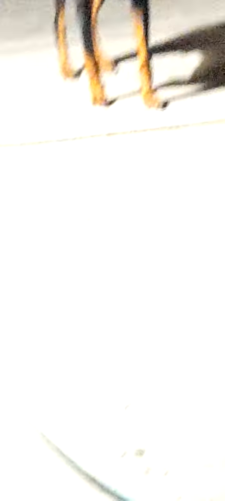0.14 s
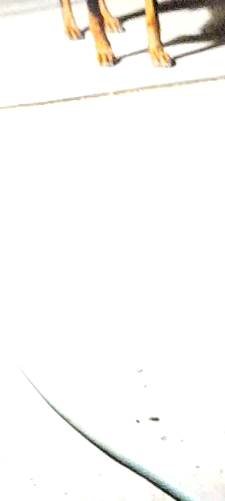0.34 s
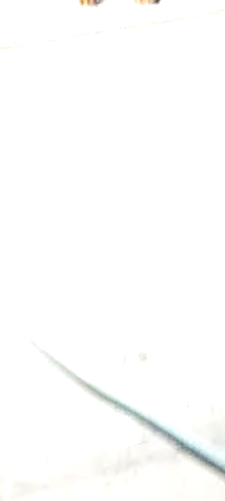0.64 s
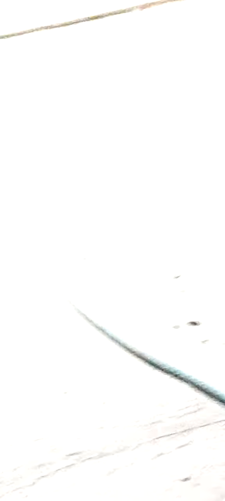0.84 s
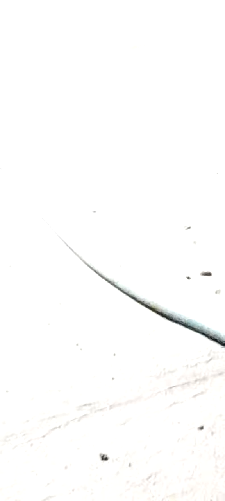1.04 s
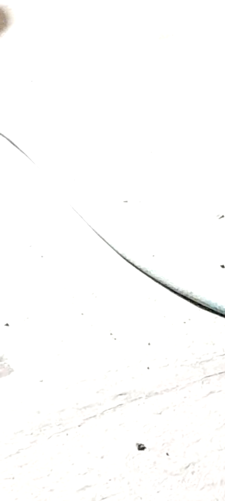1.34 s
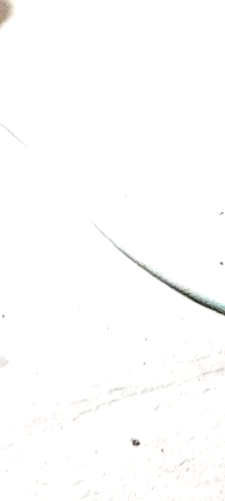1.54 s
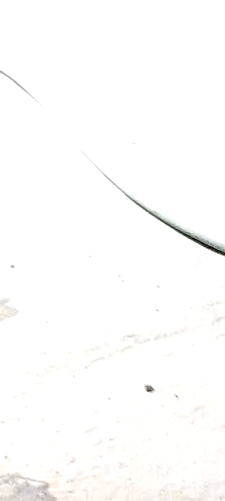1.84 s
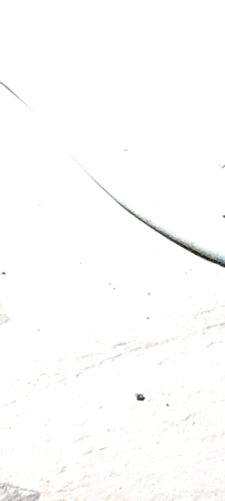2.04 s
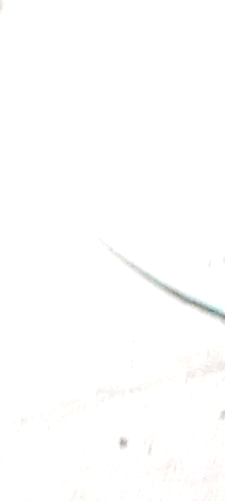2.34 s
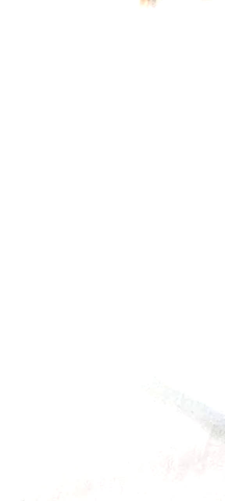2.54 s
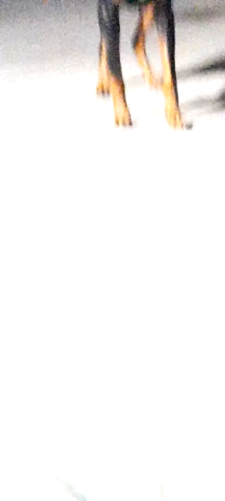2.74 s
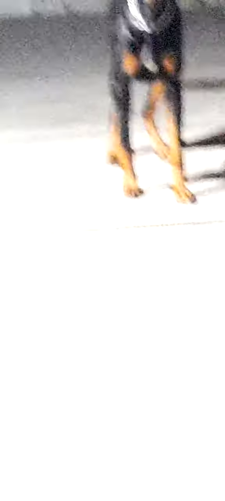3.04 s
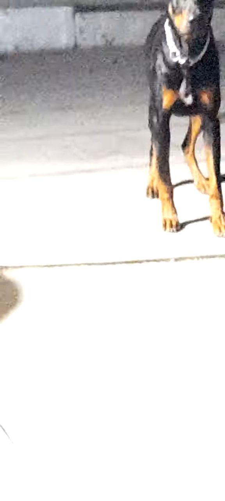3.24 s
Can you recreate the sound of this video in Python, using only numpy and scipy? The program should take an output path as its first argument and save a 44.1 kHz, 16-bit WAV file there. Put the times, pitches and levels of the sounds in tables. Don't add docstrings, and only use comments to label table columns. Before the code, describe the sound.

A ball thumps on concrete with gritty knocks, then a quiet gap, a sharp scrape with softer thumps, light claw ticks, and a last, loudest bounce; open yard at night, close handheld phone, low traffic rumble.

```python
import sys
import numpy as np
from scipy import signal
from scipy.fft import rfft, irfft, next_fast_len
from scipy.io import wavfile
from scipy.ndimage import uniform_filter1d

SR = 44100
rng = np.random.default_rng(int(sys.argv[2]) if len(sys.argv) > 2 else 0)


def transcribe(signal):
    frames = np.atleast_2d(signal).T
    limited = np.clip(frames, -1, 1)
    pcm = np.round(limited * 32767).astype(np.int16)
    wavfile.write(sys.argv[1], SR, pcm)


def volts(x):
    e = np.asarray(x, float) / 20
    return 10 ** e


N = 149940

# (f/Hz, correlation)
LIKENESS = [(30, .995), (70, 0.975), (180, 0.94), (550, 0.64), (1650, -0.096), (4970, -0.69), (15000, 0.29)]


def evened(x):
    return x / np.sqrt(np.mean(x ** 2) + 1e-20)


def read(points, hz):
    f, value = np.transpose(points)
    return np.interp(np.log(hz + 1), np.log(f + 1), value)


def curve(points):
    return np.interp(np.arange(N) / SR, *np.transpose(points))


def add(mix, s, sound):
    part = mix[round(s * SR):][:len(sound)]
    part += sound[:len(part)]


def colour(x, db_of_hz, lag_s=0):
    n = x.shape[-1]
    size = next_fast_len(n + 2048)
    hz = np.fft.rfftfreq(size, 1 / SR)
    delay = np.exp(-2j * np.pi * hz * lag_s)
    return irfft(rfft(x, size) * volts(db_of_hz(hz)) * delay, size)[..., :n]


def wash(spectrum, patchy_db):
    frames = N // 256 + 5
    hz = np.fft.rfftfreq(2048, 1 / SR)
    a, b, c, d, patches = rng.standard_normal((frames, len(hz), 5)).T
    patches = uniform_filter1d(patches, size=12, axis=0)
    patches = evened(uniform_filter1d(patches, size=10, axis=1))
    same = np.clip(read(LIKENESS, hz), -1, 1)[:, None]
    left = a + 1j * b
    right = same * left + np.sqrt(1 - same ** 2) * (c + 1j * d)
    z = np.array([left, right]) * volts(read(spectrum, hz)[:, None] + patchy_db * patches)
    return evened(signal.istft(z[..., ::2], nperseg=2048, noverlap=1536)[1][:, :N])


def background():
    # (f/Hz, level/dB per Hz)
    traffic_spectrum = [(12, -99), (26, -22.5), (51, 2.5), (214, -10.5), (245, -9.5), (408, -17.5),
                        (446, -20), (1800, -28), (4000, -60), (5200, -84), (8800, -120)]
    # (f/Hz, level/dB per Hz)
    hiss_spectrum = [(2500, -8.5), (3500, -29), (6500, -17), (9600, -12.5), (14000, -16), (16100, -15.5)]
    # (t/s, peak level/dB, f/Hz, swell/s)
    engine_throbs = [
        (0.251, -48, 76.6, 0.028),
        (0.558, -39, 60.2, 0.023),
        (2.519, -38, 65.7, 0.067),
    ]
    throbs = np.zeros(N)
    for row in engine_throbs:
        add(throbs, *thump(*row))
    traffic = volts(-42.5) * wash(traffic_spectrum, 1.7)
    hiss = volts(-78.5) * wash(hiss_spectrum, 1.6)
    return traffic + hiss + throbs


def rustle():
    # (t/s, level/dB)
    movement = [(0, -58), (.34, -63.5), (.55, -64), (.7, -73.5), (1.1, -74), (1.6, -83), (1.95, -69.5),
                (2.2, -77.5), (2.3, -70.5), (2.55, -67), (2.72, -79), (3.05, -79), (3.15, -70.5),
                (3.27, -68), (3.4, -51.5)]
    # (f/Hz, level/dB per Hz)
    cloth_spectrum = [(410, -35), (700, 0), (1280, -3), (1680, -3.5), (2220, -9.5), (6480, -21),
                      (10200, -29), (13800, -24), (15800, -34)]
    grain_db, trim_db = 1.2, 8
    crackle = np.minimum(rng.exponential(1, N // 128 + 2), 5)
    grain = volts(grain_db * np.interp(np.arange(N) / 128, np.arange(len(crackle)), crackle))
    noise = evened(colour(grain * rng.standard_normal((2, N)), lambda hz: read(cloth_spectrum, hz)))
    balance_db = np.array([[-1.2], [1.2]])
    return noise * volts(curve(movement) + trim_db + balance_db)


def scuff(s, db, rise, t60, bright_hz):
    # (f/Hz, level/dB per Hz)
    grit_spectrum = [(300, -21), (700, 8.5), (1600, -2.5), (3000, -10.5), (6000, -12.5), (10000, -21),
                     (13800, -12), (16000, -27)]
    bright_db, bright_octaves, skirt_db_per_octave = 1.5, 0.6, 6
    t = np.arange(SR // 3) / SR
    a, b = rng.standard_normal((2, len(t)))
    swell = np.sin(np.pi * t / (4 * rise)) ** 2
    fall = volts(-60 * (t - 2 * rise) / t60)
    shape = np.where(t < 2 * rise, swell, fall)

    def spectrum(hz):
        octaves = abs(np.log2((hz + 1) / bright_hz))
        bell = bright_db * np.exp(-(octaves / bright_octaves) ** 2)
        return read(grit_spectrum, hz) + bell - skirt_db_per_octave * octaves

    noise = colour(np.array([.5 * a + 1.29 * b, a]), spectrum)
    return s - rise, (volts(db) * evened(noise) * shape).T


def tick(s, db, hz, t60):
    lead_s = 0.00035
    slip_turns, dulling_db = .15, 15
    return_s, return_db = .0037, -10
    t = np.arange(2600)[:, None] / SR
    spread = .6 * rng.random((4, 1)) + .4 * rng.random((4, 2)) - .5
    width = .2 * (.012 / t60) ** .5
    ring = 0
    for k, u in enumerate(spread):
        mode_hz = hz * (1 + width * (k + .5 * u))
        mode = np.sin(2 * np.pi * (mode_hz * (t + [lead_s, 0]) + slip_turns * u))
        ring = ring + (1, 1.0, 0.91, 0.6)[k] * mode * volts(-dulling_db * k * t / t60) / 2
    onset = np.sin(np.pi / 2 * np.minimum(t / (.04 * t60), 1)) ** 2
    knock = volts(db - 60 * t / t60) * ring * onset
    return s, knock + volts(return_db) * np.roll(knock, round(return_s * SR), axis=0)


def thump(s, db, hz, swell):
    t = np.arange(0, 10 * swell, 1 / SR)
    envelope = t / swell * np.exp(1 - t / swell)
    return s, -volts(db) * np.sin(2 * np.pi * hz * t) * envelope


def yard(x):
    # (f/Hz, t60/s)
    yard_decay = [(100, .3), (400, .25), (1500, .11), (5000, .1), (12000, .08)]
    first = round(0.0063 * SR)
    taps = np.zeros((2, SR // 2))
    at = np.arange(first, SR // 2 - 20, 20)
    at = at + rng.integers(0, 20, (2, SR // 40))[:, :len(at)]
    signs = rng.choice([-1., 1.], (2, SR // 40))[:, :at.shape[1]]
    np.put_along_axis(taps, at, signs, 1)
    hz, t, z = signal.stft(taps, SR, nperseg=256)
    same = np.clip(read(LIKENESS, hz), 0, 1)[:, None]
    z = np.array([z[0], same * z[0] + np.sqrt(1 - same ** 2) * z[1]])
    decay = volts(-60 * t / read(yard_decay, hz)[:, None])
    tail = signal.istft(z * decay, SR, nperseg=256)[1]
    return signal.fftconvolve(x[None], tail / np.linalg.norm(tail[0]), axes=1)[:, :len(x)]


def scene():
    # (t/s, rms level/dB, rise/s, fall t60/s, brightest f/Hz)
    scuffs = [(.052, -54, 0.0028, 0.035, 4200), (0.16, -50.5, 0.0021, 0.021, 3220),
              (0.2131, -47, 0.0011, 0.02, 6640), (.2135, -48, 0.00091, 0.019, 11500),
              (0.224, -42, 0.0017, 0.02, 3240), (0.3272, -52, 0.00058, 0.021, 5000),
              (.3275, -64, .0008, .02, 13500), (0.3505, -46, 0.0019, 0.048, 3100),
              (.359, -55, 0.0021, 0.023, 3660), (.351, -53, 0.0011, .025, 12000),
              (.3595, -58, 0.00045, .02, 13000), (.3745, -58, 0.00089, .02, 7500),
              (0.474, -52, 0.00091, 0.04, 2820), (.482, -59.5, 0.005, .06, 6140),
              (.493, -56, 0.0035, .04, 3150), (0.946, -68.5, 0.0021, 0.15, 8600),
              (1.094, -65, 0.0011, 0.11, 5730), (1.127, -73, 0.004, .08, 7000),
              (1.808, -56.5, 0.0015, 0.069, 9000), (1.8195, -27, 0.00083, 0.026, 3720),
              (1.82, -39, 0.00084, 0.015, 14500), (1.825, -39.5, 0.0015, 0.08, 2200),
              (1.853, -50.5, 0.00087, 0.25, 2660), (2.038, -68.5, 0.0075, 0.55, 3170),
              (2.127, -69.5, 0.011, 0.066, 4600), (2.521, -60, 0.0038, 0.044, 12000),
              (2.531, -46.5, 0.0034, 0.06, 13300), (2.536, -45.5, 0.0036, 0.015, 6200),
              (2.539, -48, 0.0029, .011, 12100), (2.547, -67, 0.0022, 0.11, 7500),
              (2.552, -70, 0.0032, .08, 14500), (2.628, -64, .02, 0.21, 3900),
              (3.099, -65.5, 0.0019, 0.12, 3800), (3.226, -57, 0.0038, 0.022, 5300),
              (3.3034, -53.5, 0.00075, 0.053, 5460), (3.3085, -66, .0007, .03, 6450),
              (3.3338, -43.5, 0.00053, 0.048, 4260), (3.339, -60, 0.0011, .08, 7500),
              (3.3685, -39, .0008, 0.012, 11100), (3.368, -42, 0.0017, 0.13, 2760)]
    # (t/s, peak level/dB, f/Hz, t60/s)
    ticks = [(0.142, -53, 6500, 0.016), (.18, -70, 3850, 0.017), (0.352, -31, 1540, 0.024),
             (0.358, -27, 1500, 0.026), (0.481, -38, 1496, 0.053), (.492, -35, 1520, .03),
             (0.214, -30, 1900, 0.0096), (1.854, -37, 1670, .03), (2.1882, -41, 2170, 0.01),
             (2.2231, -39, 2200, 0.011), (2.2578, -46, 2330, 0.01), (2.2645, -44.5, 2230, 0.0086),
             (2.277, -53, 2220, 0.0084), (2.3045, -36, 2230, 0.0095), (2.3542, -42, 2420, 0.011),
             (2.3963, -44, 2390, 0.0099), (2.404, -44, 2350, 0.015), (2.535, -42, 5200, 0.029),
             (2.5405, -39, 5550, .015), (3.2856, -34.5, 1550, 0.014), (3.2893, -36.5, 1540, 0.017),
             (3.297, -46, 1550, .012), (3.3031, -30, 1630, 0.02), (3.31, -46, 1550, 0.013),
             (3.3162, -36, 1550, 0.013), (3.3345, -18, 1590, 0.017), (3.3372, -28, 1520, 0.016),
             (3.372, -24.5, 1656, 0.034), (3.378, -24, 1740, 0.025), (3.388, -25, 1400, 0.022),
             (3.394, -26.5, 1350, .03)]
    # (t/s, peak level/dB, f/Hz, swell/s)
    thumps = [(0.2126, -15.5, 325, 0.0016), (.2185, -22, 670, 0.001), (0.2239, -29, 404, 0.0009),
              (0.247, -31, 137, 0.0024), (.247, -45, 579, 0.0081), (0.277, -29.5, 90.5, 0.0016),
              (.349, -35, 250, 0.00062), (0.3525, -20, 298, 0.00093), (0.3556, -30, 198, 0.0016),
              (.361, -21.5, 179, 0.00124), (0.369, -25.5, 247, 0.0014), (0.3815, -29, 174, 0.00088),
              (0.396, -42, 257, 0.0053), (0.432, -34, 159, 0.0019), (0.473, -30.5, 206, 0.0029),
              (0.485, -33, 467, 0.0026), (0.947, -45, 456, 0.0041), (1.806, -29.5, 413, 0.0022),
              (1.8128, -28, 407, 0.0012), (1.8232, -30, 217, 0.0059), (1.822, -32.5, 108, 0.0052),
              (1.846, -34, 240, 0.0019), (2.655, -34, 201, 0.00057), (3.3665, -25, 300, 0.0017),
              (3.37, -11, 380, 0.0013), (3.3763, -9, 367, 0.003), (3.3859, -14.5, 350, 0.00091),
              (3.3926, -14.5, 325, 0.0036), (3.374, -22.5, 532, 0.0074), (3.382, -33, 1182, 0.0039),
              (3.37, -27.5, 725, 0.0061), (3.384, -29, 950, 0.0062), (.478, -43.5, 792, 0.0048)]
    # (f/Hz, level/dB)
    shadow = [(100, -1.5), (350, -4.5), (700, -1), (1500, -4.5), (5000, -6), (9000, -4), (13000, -12)]
    steady = background() + rustle()
    near = np.zeros((N + SR, 2))
    blows = np.zeros(N + SR)
    for row in scuffs:
        add(near, *scuff(*row))
    for row in ticks:
        add(near, *tick(*row))
    for row in thumps:
        add(blows, *thump(*row))
    direct = near.T + blows
    left, right = direct + volts(-15) * yard(direct[1])
    left = colour(left, lambda hz: read(shadow, hz), lag_s=.00041)
    return np.array([left, right])[:, :N] * volts(6.5) + steady


def top_cut(x):
    return signal.sosfilt(signal.butter(12, 16150, fs=SR, output="sos"), x)


def record(dry):
    ceiling, low_cut_hz, edge_hz = 1.1, 40.4, 16080
    low_cut = signal.butter(3, low_cut_hz, "high", fs=SR, output="sos")
    sound = signal.sosfilt(low_cut, ceiling * np.tanh(dry / ceiling))
    sound = np.pad(sound, ((0, 0), (0, 300)), "reflect")
    sound = signal.oaconvolve(sound, signal.firwin(301, edge_hz, fs=SR)[None], axes=1)
    sound = sound[:, 150:N + 150]
    fade = np.sin(np.pi / 2 * np.minimum(np.arange(N)[::-1] / 64, 1)) ** 2
    return top_cut(sound * fade)


dry = scene()
out = record(dry)
transcribe(out)
```